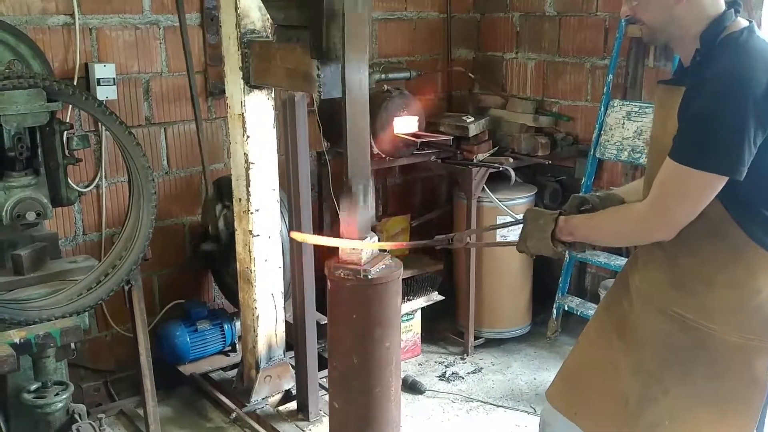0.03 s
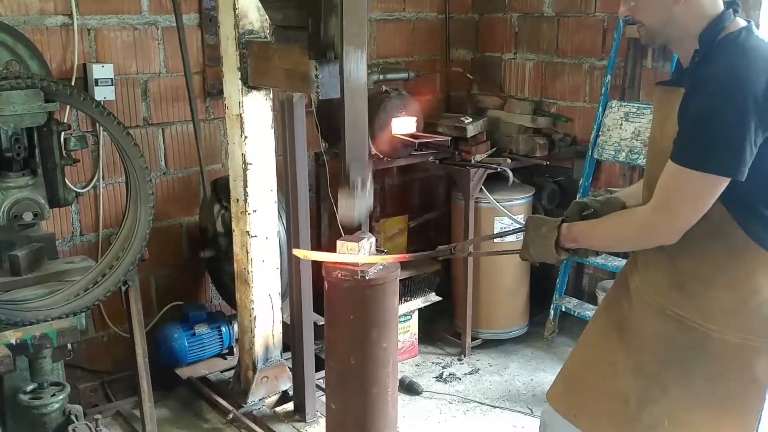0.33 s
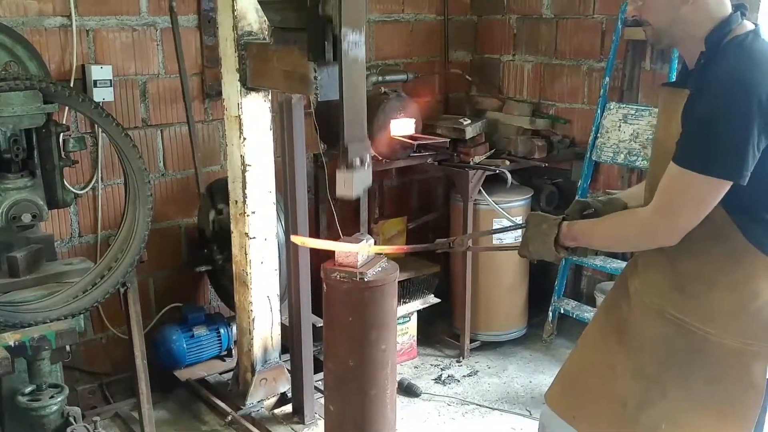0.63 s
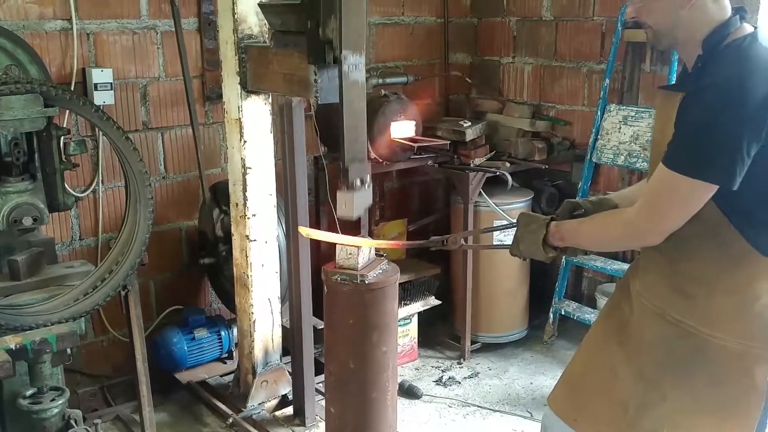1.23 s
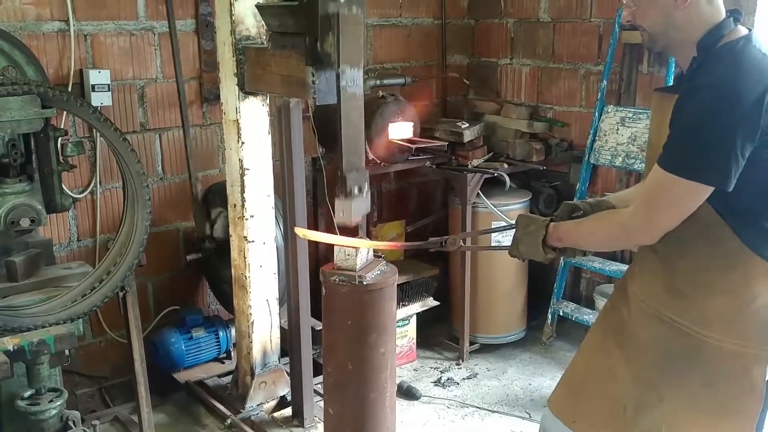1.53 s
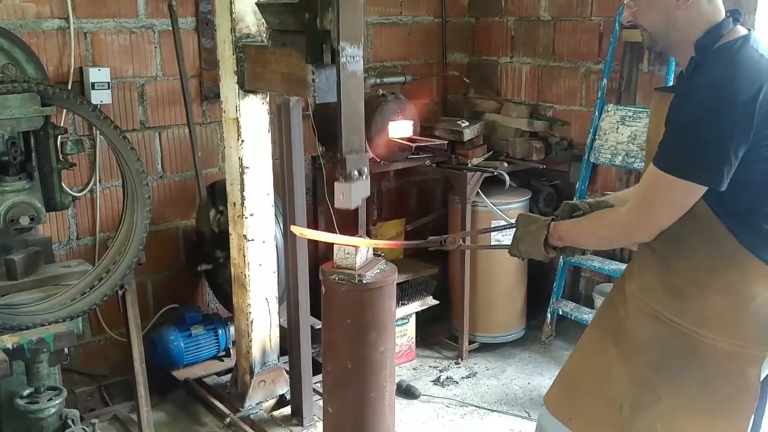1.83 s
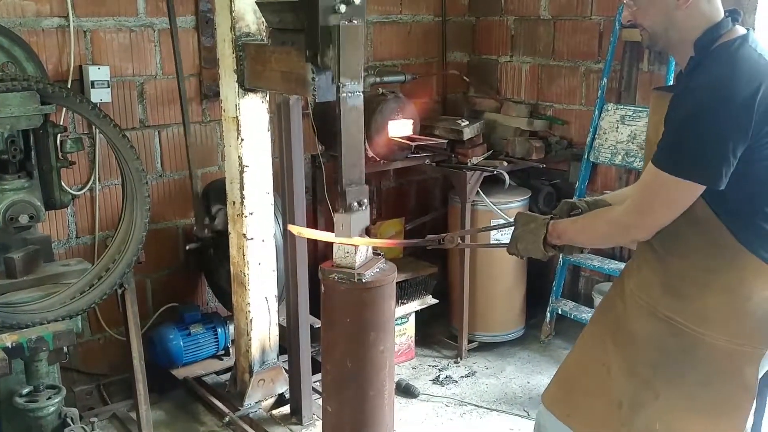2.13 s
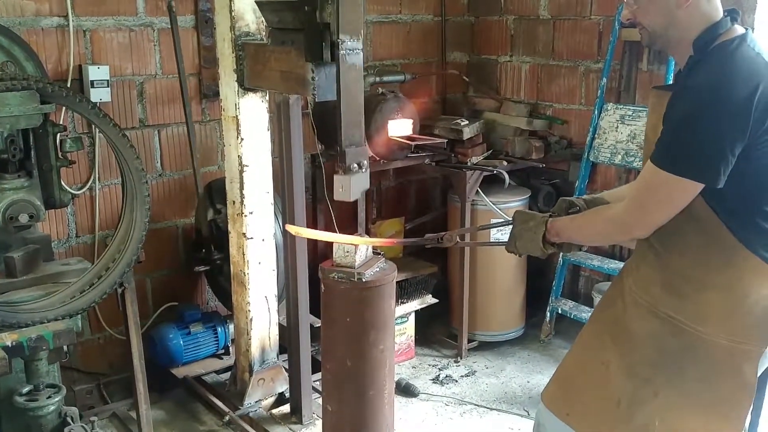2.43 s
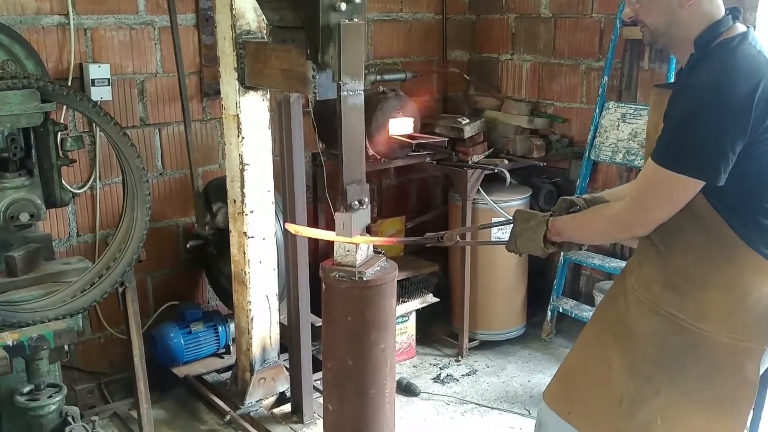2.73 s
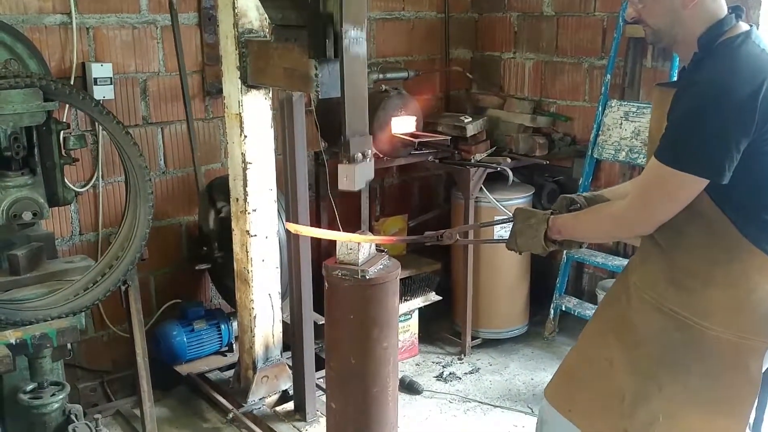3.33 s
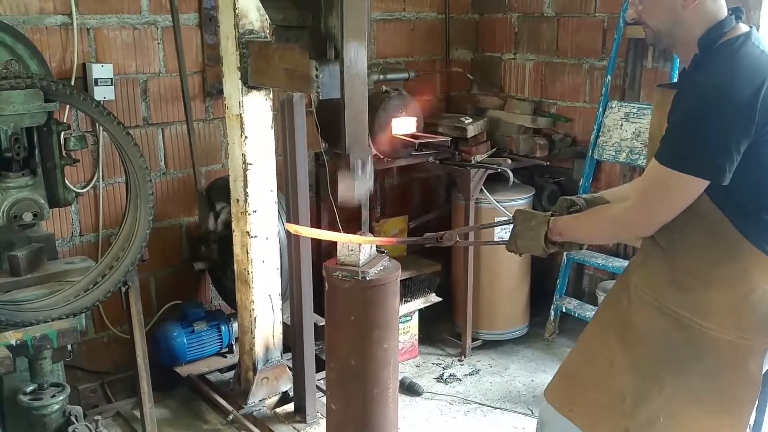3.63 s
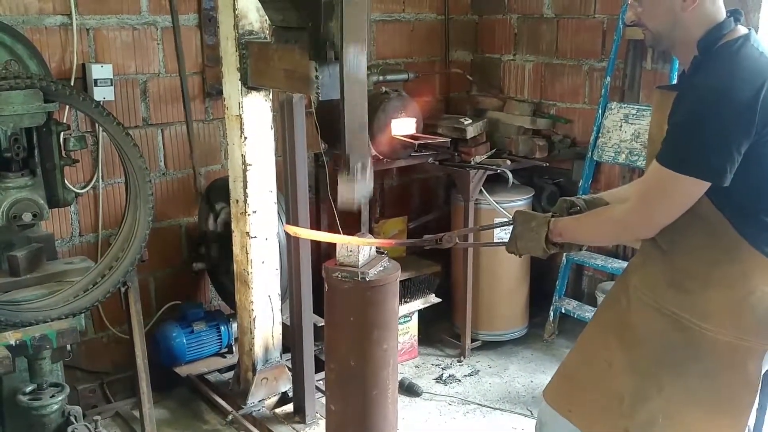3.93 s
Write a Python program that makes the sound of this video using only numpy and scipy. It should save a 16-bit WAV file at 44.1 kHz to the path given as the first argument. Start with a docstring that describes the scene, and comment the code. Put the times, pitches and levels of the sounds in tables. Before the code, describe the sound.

A power hammer pounds a metal bar in quick, overlapping steel clashes that ring through a workshop. It eases to a few light knocks, then pounds hard again, with a low motor drone underneath throughout.

```python
"""A homemade power hammer forges a hot bar in a brick workshop. Its ram (the moving weight), the ram's
guide and the loose linkage clash in quick overlapping runs, ease off to a few light knocks with one
thin squeak and a low whoomp of the ram, then pound again. Every contact rings through the steel frame
and the room, and some set loose steel parts ringing clearly. The motor and its drive drone underneath."""
import sys
import numpy as np
from scipy import signal
from scipy.fft import rfft, irfft
from scipy.io import wavfile

SR = 44100
rng = np.random.default_rng(int(sys.argv[2]) if len(sys.argv) > 2 else 0)


def to_wav(s):
    """Save 16-bit WAV."""
    ch = np.atleast_2d(s).T  # columns
    pcm = np.round(np.clip(ch, -1, 1) * 32767)  # PCM
    wavfile.write(sys.argv[1], SR, pcm.astype(np.int16))


N = 176400  # 4 seconds


def from_db(db):
    """Turn decibels into a number to multiply a sound by."""
    return 10 ** (np.asarray(db) / 20)


def unit_power(x):
    """Scale a sound so that its average power is 1."""
    return x / np.sqrt(np.mean(x ** 2) + 1e-20)


def at_hz(points, hz):
    """Read between the rows of a (frequency, value) table, giving each octave equal room."""
    freqs, values = np.transpose(points)
    return np.interp(np.log(hz + 0.00081), np.log(freqs), values)  # the tiny offset avoids log(0)


def pan(db):
    """Share a sound between left and right at the same total power; positive dB leans left."""
    half = np.atleast_1d(db) / 2
    gains = np.array([from_db(half), from_db(-half)])
    return gains / np.sqrt(np.mean(gains ** 2, axis=0))


def decay(t, ring_s):
    """A smooth fade that falls 60 dB in the ring time, ring_s."""
    return np.exp(-np.log(1000) * t / ring_s)


def drift(rate_hz):
    """A smooth random wobble of typical size 1, mostly slower than rate_hz."""
    f = np.fft.rfftfreq(N, 1 / SR)
    return unit_power(irfft(rfft(rng.standard_normal(N)) / (1 + (f / rate_hz) ** 2) ** 2, N))


def room_noise(colour, peaks, size):
    """Stereo noise shaped by a colour (level at each frequency) and by peaks on top of it."""
    # the two sides are alike in the bass, unrelated in the treble: (frequency [Hz], likeness [0 to 1])
    likeness = [(60, 1), (150, 1), (300, 0.75), (600, 0.86), (1200, 0.11), (4000, 0.054), (15000, 0)]
    # which side is louder: (frequency [Hz], left over right [dB])
    balance = [(120, -2.5), (400, -0.1), (1000, 1.4), (2600, -4), (4500, 1.5), (9500, 0), (11700, -2),
               (13000, -7), (15000, -20.5)]
    f = np.fft.rfftfreq(size, 1 / SR)
    shared, opposed = rfft(rng.standard_normal((2, size)))
    alike = np.clip(at_hz(likeness, f), -.99, .99)
    both = np.sqrt(1 + alike) * shared + np.sqrt(1 - alike) * opposed * np.array([[1], [-1]])
    peak_db = sum(lift / (1 + (2 * (f - hz) / width) ** 2) for hz, width, lift in peaks)
    gain = from_db(at_hz(colour, f) + peak_db)
    return unit_power(irfft(both * gain * pan(at_hz(balance, f)), size))


def steel_note(t, hz, ring_s):
    """One fading note of struck steel, reaching each side at a random point in its wave."""
    return np.sqrt(2) * np.sin(2 * np.pi * (hz * t + rng.random((2, 1)))) * decay(t, ring_s)


def frame_ring(low_hz, high_hz, ring_s):
    """Frame and room answer a hit in one pitch range: a crack, a wash of blurred notes, any clear ones."""
    # the frame's many tightly packed notes: (frequency [Hz], relative level [dB])
    frame_colour = [(120, -9), (200, -5.5), (260, -6), (330, -11.5), (440, -11.5), (620, -1), (780, -2.5),
                    (1050, -0.5), (1650, -2.5), (1920, -5), (2500, -2.5), (3150, -9), (3650, -9),
                    (4800, -8.5), (6400, -13.5), (7400, -16), (10200, -19), (11500, -19.5), (14000, -23),
                    (15500, -30)]
    # high ranges where the steel rings more strongly: (frequency [Hz], width [Hz], lift [dB])
    steel_peaks = [(3690, 120, 3.5), (7450, 99, 3), (8700, 320, 7), (9600, 150, 5.5), (10100, 350, 7),
                   (13000, 260, 10.5)]
    # clear notes: (pitch [Hz], level against the wash [dB], ring time [s], left over right [dB])
    frame_notes = [(620.4, -12.5, 0.56, -1), (874, -10, .55, -1), (893, -14, .55, -2.5),
                   (957, -11, 0.59, -6.5), (1056.4, -9, .5, -1.5), (1082, -13, .5, -17),
                   (1135, -14.5, 0.43, 15.5), (1199, -15.5, 0.3, -3), (1525, -18, .45, -1.5),
                   (1620, -14.5, 0.51, -9), (1681, -15, .45, -6), (1730, -11.5, .45, 15.5),
                   (2164, -15, 0.5, -2), (2818, -13.5, .45, -3), (3620, -18, .38, 3),
                   (4400, -18, 0.44, -0.5)]
    t = np.arange(SR) / SR
    band = signal.butter(5, [low_hz, min(high_hz, .45 * SR)], "band", fs=SR, output="sos")
    # each struck spot favours its own clusters of notes
    patch_hz, patch_db = 69.95, 2.5
    grid = patch_hz * np.arange(1, 512)
    patches = patch_db * np.minimum(grid / 2500, 1) * rng.standard_normal(len(grid))
    wash = room_noise(np.c_[grid, at_hz(frame_colour, grid) + patches], steel_peaks, size=SR)
    wash = wash / np.std(signal.sosfilt(band, wash))
    crack_s, left_lag_s = .0016, .00007
    crack = .92 * wash[0, ::-1] * np.exp(-t / crack_s)
    crack = np.array([np.interp(t - left_lag_s, t, crack, left=0), crack])
    in_band = [row for row in frame_notes if low_hz <= row[0] < high_hz]
    notes = sum(from_db(db) * pan(side) * steel_note(t, hz, note_s) for hz, db, note_s, side in in_band)
    swell = 1 - .64 * np.exp(-t / .0092)  # the ring takes a moment to build
    ring = swell * (wash * decay(t, ring_s) + notes)
    power = 1 + sum(from_db(row[1]) ** 2 for row in in_band)
    return signal.sosfilt(band, crack + ring) / np.sqrt(power)


def contacts(times, db, bounces=3, bounce_s=.02, bounce_db=-8):
    """Steel meets steel: one click for each contact, then a few weaker bounces."""
    timing, direction = rng.random((len(times), 2, bounces)).swapaxes(0, 1)
    delay = np.c_[np.zeros(len(times)), -bounce_s * np.log(1 - .95 * timing)]
    force = np.c_[np.ones(len(times)), from_db(bounce_db) * np.sign(direction - .5)]
    force *= (from_db(db) / np.linalg.norm(force, axis=1))[:, None]  # the clicks share the hit's energy
    starts = ((times[:, None] + delay) * SR).astype(int)
    clicks = np.zeros(N + SR)
    np.add.at(clicks, starts, force)
    return clicks[None, :N]


def hammer(spots=4):
    """Ram and linkage hit a few spots in turn, and each hit rings the frame in five pitch ranges."""
    # hits and their strength in each range:
    # (time [s], thud [dB], body [dB], clang [dB], clash [dB], sizzle [dB])
    blows = [(0.0, -22, -13.0, -6, -10.5, -12.5), (0.019, -25, -10.5, -13.5, -12.5, -11.5),
             (0.075, -22.0, -10.5, -8, -12, -15.5), (0.12, -17, -10.5, -15, -11.5, -7.5),
             (0.16, -15.5, -13, -4, -9, -5.5), (0.225, -22, -9, -7.5, -9.5, -11.5),
             (0.265, -23.5, -12, -7.5, -10, -13.5), (0.322, -20.5, -10.5, -7.5, -9.0, -6.5),
             (0.384, -20, -13.5, -11.5, -14, -22), (0.428, -26, -8.5, -13.5, -15, -14.5),
             (0.465, -21.5, -19, -14.5, -14.0, -44), (0.587, -23.5, -22.5, -31, -25.5, -30.5),
             (0.642, -48, -22, -15.5, -16.5, -15.5), (0.668, -19.5, -9.5, -9, -11.5, -13),
             (0.747, -23, -14, -13, -13, -13.5), (0.837, -29, -31.0, -32, -24.5, -39),
             (0.89, -23, -16.5, -9, -15.5, -24), (0.922, -13, -8.5, -8.5, -14, -16),
             (0.965, -31, -10.0, -11.5, -12.5, -23.0), (1.02, -24.5, -10.5, -19.5, -19, -43),
             (1.088, -28, -28, -21, -16.5, -20), (1.116, -25, -13.5, -12.5, -11.5, -7.5),
             (1.16, -26.5, -16.5, -11.5, -14, -12), (1.205, -20, -13.0, -8.5, -12.5, -17),
             (1.309, -33, -18, -17.5, -18.5, -24), (1.345, -29.5, -31, -50, -54, -54),
             (1.49, -30, -31, -37, -34.5, -55), (1.515, -37, -34, -48, -64, -72),
             (1.627, -43, -42, -33, -37.5, -55.0), (1.67, -41.0, -46, -42, -44, -51),
             (1.717, -33.5, -35.5, -30, -30.5, -49), (1.751, -37, -32.5, -29.5, -40, -64),
             (1.8, -42, -42, -35.5, -42.0, -59.0), (1.865, -52.5, -45.5, -51.0, -43.5, -57.0),
             (2.225, -49.5, -45.5, -55.5, -66, -74.5), (2.28, -31, -43, -50, -55, -54),
             (2.306, -38, -30, -27, -28.5, -40), (2.34, -40, -29.0, -27.5, -26, -46.0),
             (2.391, -33, -19, -17.5, -17.5, -27.5), (2.422, -22.5, -18.5, -17.5, -19, -46),
             (2.515, -38, -27, -17.5, -23, -38.5), (2.583, -37, -24, -29, -29, -53),
             (2.661, -34, -32, -36, -43, -59), (2.778, -19, -17.5, -12.5, -21.5, -44.5),
             (2.8, -23, -16.5, -18, -26, -51), (2.919, -33, -25, -26.5, -25.5, -43),
             (2.951, -26, -21.5, -12.5, -13.5, -18.5), (2.989, -25, -16.5, -12, -13, -19.5),
             (3.058, -21.5, -16, -15, -16.5, -24.5), (3.112, -32, -15.5, -11.5, -12, -18.5),
             (3.167, -18.5, -14.5, -11.5, -11, -10.5), (3.224, -18.5, -8.5, -8, -10, -11.5),
             (3.27, -21, -9.0, -8.5, -11, -18), (3.32, -34, -7.5, -10.0, -13.5, -27),
             (3.38, -28, -10, -8, -10.5, -8.5), (3.45, -24.0, -11, -10.5, -14.5, -19),
             (3.513, -19.5, -11.0, -9.5, -10.5, -10), (3.59, -16.5, -8, -7.5, -11.5, -9.5),
             (3.635, -31, -9.5, -5, -12.5, -14.5), (3.69, -23.0, -11, -9.5, -12.5, -19.0),
             (3.745, -18.5, -16.5, -6.5, -9, -5.5), (3.8, -19, -8.5, -8.5, -12.5, -14.0),
             (3.848, -19, -16.5, -11, -10.5, -6.5), (3.895, -17.5, -9, -7, -9.5, -8),
             (3.955, -18, -11.5, -4.5, -11, -14.5)]
    # the ranges, thud to sizzle: (low edge [Hz], high edge [Hz], ring time [s], added level [dB])
    pitch_ranges = [(185, 522, 0.36, -0.5), (548, 1424, 0.41, 0), (1453, 3220, 0.41, -.5),
                    (3176, 6500, 0.33, 0), (6300, 27000, 0.26, -1)]
    times, *levels = np.transpose(blows)
    out = 0
    for db, (low_hz, high_hz, ring_s, added_db) in zip(levels, pitch_ranges):
        for spot in range(spots):
            clicks = contacts(times[spot::spots], db[spot::spots] + added_db)
            ring = frame_ring(low_hz, high_hz, ring_s)
            out = out + signal.fftconvolve(clicks, ring, axes=1)[:, :N]  # every click starts a ring
    return out


def loose_parts(flutter_depth=.8, flutter_hz=70, rise_s=.002):
    """Loose steel parts ring out clearly, and echoes make each ring flutter."""
    # the clear rings: (time [s], pitch [Hz], level [dB], ring time [s])
    pings = [(0.0, 2056, -14.5, .55), (.225, 2600, -24, 0.49), (.465, 1064, -20, .5),
             (0.585, 2780, -24, 0.29), (.668, 2850, -20.5, .45), (.668, 1059, -16.5, 0.64),
             (.747, 2065, -24, 0.61), (.747, 2816, -25, 0.24), (0.888, 2833, -26, 0.62),
             (.965, 2824, -18, 0.46), (1.161, 2826, -23, .4), (1.204, 1760, -27, 0.59),
             (1.492, 2820, -23.5, 0.21), (1.671, 2860, -38.5, .4), (1.751, 2830, -41, 0.42),
             (2.392, 2818, -21.5, .45), (2.392, 3775, -17, 0.27), (2.422, 1764, -18, 0.52),
             (2.422, 1623, -26, .45), (2.777, 2860, -29, 0.26), (2.952, 2800, -18.5, 0.39),
             (2.99, 1688, -23, 0.48), (2.99, 3750, -17, 0.36), (3.058, 2828, -22, 0.43),
             (3.224, 1067, -15.5, 0.66), (3.27, 1092, -20, 0.37), (3.27, 1195, -19, 0.38),
             (3.451, 1176, -15.5, 0.58), (3.956, 1123, -17, .5)]
    t = np.arange(SR) / SR
    rise = 1 - np.exp(-t / rise_s)
    out = np.zeros((2, N + SR))
    for start_s, hz, db, ring_s in pings:
        start = int(start_s * SR)
        steps = rng.standard_normal((2, 128))
        flutter = np.array([np.interp(t * flutter_hz, np.arange(128), side) for side in steps])
        ring = steel_note(t, hz, ring_s) + flutter_depth * flutter * steel_note(t, hz, ring_s)
        out[:, start:start + SR] += from_db(db) * rise * ring
    return out[:, :N]


def wavering_tone(hz, wander_hz, rate_hz):
    """A tone whose pitch strays at random by about wander_hz."""
    pitch = hz + wander_hz * drift(rate_hz)
    return np.sqrt(2) * np.sin(2 * np.pi * np.cumsum(pitch) / SR)


def drone(rumble_db=-37, flutter_db=1.9, waver_hz=28):
    """Three wavering low tones over the motor's rumble; the middle one also carries the ram's whoomp."""
    # rumble of motor and workshop: (frequency [Hz], relative level [dB])
    rumble_colour = [(22, -31.5), (35, -19.5), (48, -14), (68, -9.5), (88, -10), (105, -15.5), (135, -10.5),
                     (190, -7.5), (250, -18), (350, -22.5), (430, -29), (510, -19.5), (600, -30.5),
                     (1100, -34), (2000, -42.5), (4500, -50), (9000, -59), (15500, -63.5)]
    # three low tones of the drone: (pitch [Hz], wander [Hz], added level [dB])
    drone_tones = [(67, 4.9, -1.5), (141, 7, -1.5), (202.4, 3.3, -2)]
    # the drone's low tone swells and fades: (time [s], level [dB])
    low_swells = [(0.0, -57), (0.29, -36), (0.32, -53), (0.38, -27.5), (0.59, -43), (0.62, -29),
                  (0.76, -36), (0.82, -31), (0.97, -53), (1.11, -27), (1.19, -47), (1.29, -27.5),
                  (1.58, -50), (1.64, -28.5), (2.05, -35), (2.08, -25.5), (2.22, -50), (2.25, -34),
                  (2.86, -32), (3.19, -32.5), (3.22, -52), (3.32, -33), (3.36, -49), (3.59, -28),
                  (3.62, -54), (3.73, -33), (3.75, -38), (4.0, -52)]
    # so does the middle one, which also carries the ram's whoomp near 2.26 s: (time [s], level [dB])
    middle_and_whoomp = [(0.0, -49), (0.9, -33), (1.36, -37.5), (1.46, -26), (1.53, -48.5), (1.98, -35.5),
                         (2.15, -53.5), (2.26, -25.5), (2.35, -40), (2.45, -31), (2.74, -50), (2.76, -31),
                         (3.09, -34), (3.11, -44), (3.82, -33), (4.0, -41)]
    # the upper tone's swells: (time [s], level [dB])
    upper_swells = [(1.35, -53), (1.458, -33), (1.516, -54), (1.7, -37.5), (2.172, -55), (2.296, -29),
                    (2.414, -44), (2.456, -36), (2.75, -35)]
    t = np.arange(N) / SR
    out = from_db(rumble_db) * room_noise(rumble_colour, peaks=[], size=N)
    curves = (low_swells, middle_and_whoomp, upper_swells)
    for curve, (hz, wander_hz, added_db) in zip(curves, drone_tones):
        tone = wavering_tone(hz, wander_hz, waver_hz)
        db = np.interp(t, *np.transpose(curve)) + added_db + flutter_db * drift(waver_hz)
        out = out + tone * from_db(db)
    return out


def squeak(rise_s=.0068, tail_db=-10, side_db=-25.5):
    """A thin squeak on the right, likely the ram's guide: two short rubs, each lingering in the room."""
    # the rubs: (time [s], level [dB])
    rubs = [(2.289, -24), (2.304, -27)]
    t = np.arange(N) / SR
    tone = wavering_tone(hz=13000, wander_hz=87, rate_hz=215)
    level = 0
    for start_s, db in rubs:
        age = np.maximum(t - start_s, 0)
        rub = np.sin(np.pi * np.minimum(age / (2 * rise_s), 1)) ** 2
        tail = from_db(tail_db) * np.minimum(age / rise_s, 1) * decay(age, ring_s=.2)
        level = level + from_db(db) * (rub + tail)
    return pan(side_db) * tone * level


def scene():
    """The whole machine: its steel noises over the low drone."""
    steel = hammer() + loose_parts() + squeak()
    return steel + drone()


def record(dry):
    """Turn the sound up a little, round off its loudest peaks and cut the very highest treble."""
    boost_db, ceiling, cutoff_hz = 1.5, .98, 15700
    rounded = ceiling * np.tanh(dry * from_db(boost_db) / ceiling)
    treble_cut = signal.ellip(10, .2, 70, cutoff_hz, fs=SR, output="sos")
    return signal.sosfilt(treble_cut, rounded)


dry = scene()
out = record(dry)
to_wav(out)
```